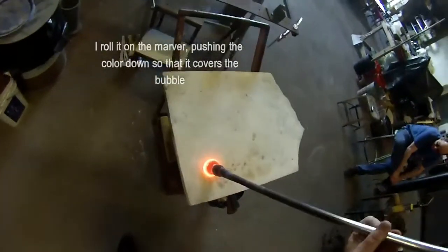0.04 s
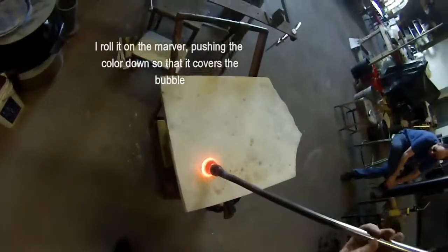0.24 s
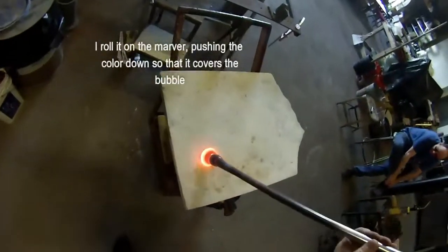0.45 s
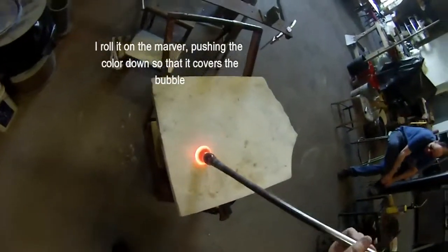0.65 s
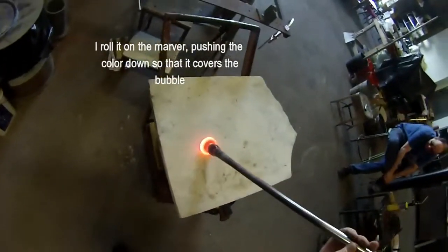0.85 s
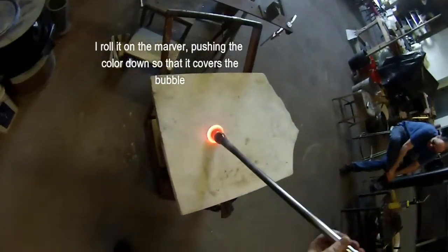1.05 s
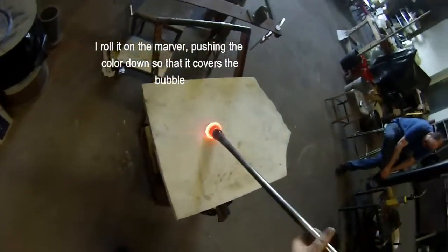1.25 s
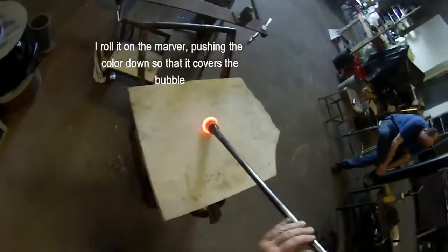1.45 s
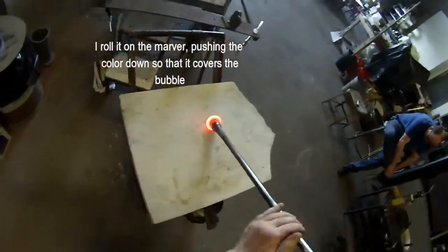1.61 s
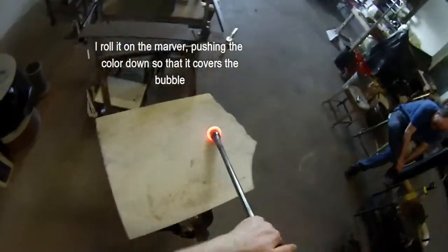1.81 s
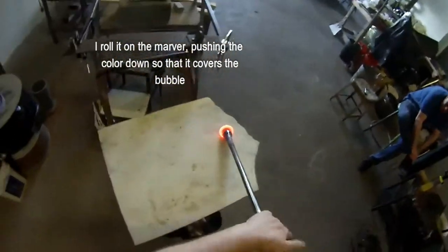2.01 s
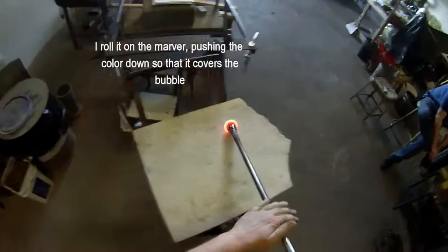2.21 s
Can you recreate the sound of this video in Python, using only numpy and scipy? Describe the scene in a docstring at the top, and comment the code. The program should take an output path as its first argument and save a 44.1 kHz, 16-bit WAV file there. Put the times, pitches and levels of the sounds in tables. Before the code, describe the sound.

Steady roar of furnace burners and fans in a glass workshop, with one soft deep thump late

```python
"""A steady roar of furnace burners and fans fills a glass workshop: shaped noise with ringing ducts.
Through it a burner sings in four breathy, drifting resonances, and a fan bearing chirps faintly in short sine beads.
Low noise is air rumbling on the carried microphone; brief low-pitched swells are buffets and one soft, deep thump.
A momentary peak in the roar (a millisecond sine blip) and two faint scuffs (bright noise) barely rise out of it."""
import sys
import numpy as np
from scipy import signal
from scipy.fft import rfft, irfft
from scipy.io import wavfile
from scipy.ndimage import uniform_filter1d, map_coordinates

SR = 44100
rng = np.random.default_rng(int(sys.argv[2]) if len(sys.argv) > 2 else 0)


def bounce(signal):
    """Save signal as a 16-bit WAV file at the path given by the first command-line argument."""
    frames = np.transpose(np.atleast_2d(signal))
    limited = np.clip(frames, -1, 1)
    pcm = np.round(limited * 32767).astype(np.int16)
    wavfile.write(sys.argv[1], SR, pcm)


N = 100018


def undb(db):
    """Decibels to amplitude gain."""
    return 10 ** (np.asarray(db) / 20)


def noise(gain):
    """Random noise of rms 1 whose amplitude spectrum follows gain(Hz)."""
    hz = np.arange(N // 2 + 1) * SR / N + 1e-6  # the offset keeps the logarithm of 0 Hz finite
    shaped = irfft(rfft(rng.standard_normal(N)) * gain(hz), N)
    return shaped / np.std(shaped)


def coloured(points):
    """Noise of rms 1, its spectrum drawn through (Hz, dB) points on a log frequency axis."""
    hz, db = np.array(points).T
    return noise(lambda f: undb(np.interp(np.log(f), np.log(hz), db)))


def resonance(hz, width_hz):
    """Turbulence ringing a resonance with steep skirts, 6 dB down at width_hz either side."""
    return noise(lambda f: 1 / (1 + ((f - hz) / width_hz) ** 2))


def walk(rate_hz):
    """Slow random drift of rms 1, changing about rate_hz times a second."""
    return noise(lambda f: np.exp(-.5 * (f / rate_hz) ** 2) * (f > .1))


def roar():
    """Flames and fans make broad turbulent noise of flickering level, and the ducts ring steadily in it."""
    # relative spectrum of burners and fans: frequency_hz, density_db
    spectrum = [(20, -7), (60, -0.5), (110, 1), (165, -4), (230, -7), (370, -5.5), (560, -8), (700, -11),
                (980, -11), (1130, -5), (1600, -7), (1850, -14), (2050, -8.5), (2280, -9.5), (2650, -19),
                (3200, -22), (3750, -21), (4300, -26.5), (5500, -28), (6300, -31), (8000, -34.5),
                (10000, -38.5), (12000, -40), (15000, -48)]
    # fan and duct resonances: frequency_hz, width_hz, level_db
    ducts = [(497, 29, -61.5), (631, 19, -74), (818, 64, -65.5), (1660, 12, -73), (1960, 12, -77.5),
             (2070, 38, -76), (2201, 33, -64.5), (3790, 48, -84.5)]
    level_db, flicker_db, flicker_hz = -50.5, 0.53, 8.7
    broad = coloured(spectrum) * undb(level_db + flicker_db * walk(flicker_hz))
    ringing = sum(undb(db) * resonance(hz, width_hz) for hz, width_hz, db in ducts)
    return broad + ringing


def burner(t):
    """Gas flow rings four close resonances that flutter and drift in pitch together."""
    # burner resonances ahead of pitch drift and swells: frequency_hz, width_hz, level_db
    modes = [(1287.5, 13.8, -59.5), (1336, 28, -60.5), (1382, 14, -62), (1461.6, 32, -60.5)]
    # the singing holds its pitch, sags once and recovers: time_s, pitch_ratio
    sag = [(1.62, 1), (1.82, .968), (2.1, 1)]
    # swells of the singing: time_s, relative_level_db
    singing = [(0, -.5), (.12, -1), (.16, 4), (.21, -1), (.34, 1), (.44, 4.5), (.5, 1), (.6, 2.5),
               (.69, -.5), (.82, 2.5), (.92, 1.5), (.98, -2), (1.03, 3), (1.19, -1), (1.27, 2.5),
               (1.49, .5), (1.6, -3.5), (1.69, 1.5), (1.82, .5), (1.9, -7), (2.27, -4.5)]
    settle_s, steadiness = .09, .55  # steadiness 0 leaves the level free, 1 evens it out
    wander_ratio, wander_hz = 0.00315, 5.4
    flutter_db, flutter_hz = 1.1, 21

    ring = sum(undb(db) * resonance(hz, width_hz) for hz, width_hz, db in modes)
    # the singing sustains itself, so it seldom drops out
    power = uniform_filter1d(ring ** 2, int(settle_s * SR))
    ring = ring * (power.mean() / power) ** (steadiness / 2)

    pitch_ratio = np.interp(t, *np.array(sag).T) * (1 + wander_ratio * walk(wander_hz))
    # reading the ringing faster or slower bends all four resonances together
    sung = map_coordinates(ring, [np.cumsum(pitch_ratio)], mode="mirror")
    strength_db = np.interp(t, *np.array(singing).T)
    return sung * undb(strength_db + flutter_db * walk(flutter_hz))


def bearing(t):
    """Faint high chirps with their octave, as of a dry fan bearing; they fade as the microphone turns away."""
    pitch_hz, level_db, octave_db = 5660, -74, -82  # levels ahead of the scatter and fade
    rate_hz, jitter_s, width_s, scatter_db = 15.5, .012, .005, 2.5
    wander_ratio = .004
    fade_start_s, fade_db_per_s = 1.5, 12

    chance = rng.standard_normal((int(t[-1] * rate_hz) + 1, 2))
    beads = 0
    for turn, (late, size) in enumerate(chance):
        age = t - turn / rate_hz - jitter_s * late
        beads = beads + undb(scatter_db * size) * np.exp(-.5 * (age / width_s) ** 2)

    phase = 2 * np.pi * pitch_hz * np.cumsum(1 + wander_ratio * walk(rate_hz)) / SR
    tone = undb(level_db) * np.sin(phase) + undb(octave_db) * np.sin(2 * phase)
    fade = undb(-fade_db_per_s * np.maximum(t - fade_start_s, 0))
    return beads * tone * fade


def swell(age, hz, db, rise_s, decay_s):
    """A deep push on the microphone that swells and dies within a few cycles, bell-shaped in level."""
    width_s = np.where(age < 0, rise_s, decay_s)
    return undb(db) * np.cos(2 * np.pi * hz * age) * np.exp(-.5 * (age / width_s) ** 2)


def draught(t):
    """Eddies of air rumble on the microphone, and a few stronger ones buffet it."""
    # relative spectrum of air on the microphone: frequency_hz, density_db
    spectrum = [(5, 1), (12, 0), (33, 0), (48, -1), (65, -7), (78, -10.5), (95, -22.5), (160, -47),
                (400, -77)]
    # strength of that air: time_s, level_db
    gusts = [(0, -50.5), (.12, -57), (.21, -47), (.47, -44.5), (.55, -49.5), (.62, -51.5), (.74, -43.5),
             (.85, -45.5), (.93, -49), (1.04, -43), (1.12, -49), (1.35, -44), (1.6, -41), (1.7, -39.5),
             (1.85, -39), (2.1, -42.5), (2.2, -42.5), (2.27, -46)]
    # buffets of air: peak_time_s, frequency_hz, peak_level_db, half_length_s
    buffets = [(.05, 25.7, -39.5, .02), (0.694, 46, -36.5, 0.014), (0.87, 38, -35.5, 0.015),
               (1.291, 28.2, -33.5, 0.017), (1.688, 42, -35.5, .014), (1.892, 23.1, -26, 0.019),
               (1.989, 32.8, -29.5, 0.023), (2.043, 35.6, -29.5, 0.02), (2.136, 30, -34.5, 0.021)]
    rumble = coloured(spectrum) * undb(np.interp(t, *np.array(gusts).T))
    pushes = sum(swell(t - at, hz, db, half_s, half_s) for at, hz, db, half_s in buffets)
    return rumble + pushes


def noise_peak(t):
    """A momentary peak in the roar, played as a millisecond sine blip."""
    start_s, pitch_hz, level_db, decay_s = .6328, 1420, -36.5, 0.0015
    age = np.maximum(t - start_s, 0)
    return undb(level_db) * np.sin(2 * np.pi * pitch_hz * age) * np.exp(-age / decay_s)


def thump(t):
    """One soft, deep bump on the microphone, with a shorter, higher knock on top."""
    # the bump and its knock: frequency_hz, peak_level_db, rise_s, decay_s
    parts = [(25, -21, .024, .024), (63, -25, .017, .021)]
    peak_s = 1.792
    return sum(swell(t - peak_s, hz, db, rise_s, decay_s) for hz, db, rise_s, decay_s in parts)


def scuffs(t):
    """Brief bright rubs of friction noise, as of a hand on the blowpipe."""
    # faint scuffs: start_s, peak_level_db, rise_s
    rubs = [(2.07, -65.5, .005), (2.103, -65, .0025)]
    centre_hz, width_hz = 5940, 2700
    shape = 0
    for start_s, db, rise_s in rubs:
        age = np.maximum(t - start_s, 0) / rise_s
        shape = shape + undb(db) * age * np.exp(1 - age)  # peaks one rise time after the start
    return shape * resonance(centre_hz, width_hz)


def scene():
    """Every source sums at one microphone."""
    t = np.arange(N) / SR
    steady = roar() + burner(t) + bearing(t) + draught(t)
    return (steady + noise_peak(t) + thump(t) + scuffs(t))[None]


def record(dry):
    """The sound opens and closes without a click, and a steep low-pass cuts the top treble."""
    edge_s, top_hz = .005, 15150
    t = np.arange(N) / SR
    ease = np.sin(np.pi / 2 * np.clip(np.minimum(t, t[-1] - t) / edge_s, 0, 1))
    low_pass = signal.ellip(10, .1, 80, top_hz, fs=SR, output="sos")  # order, ripple dB, rejection dB
    return signal.sosfilt(low_pass, dry * ease)


dry = scene()
out = record(dry)
bounce(out)
```